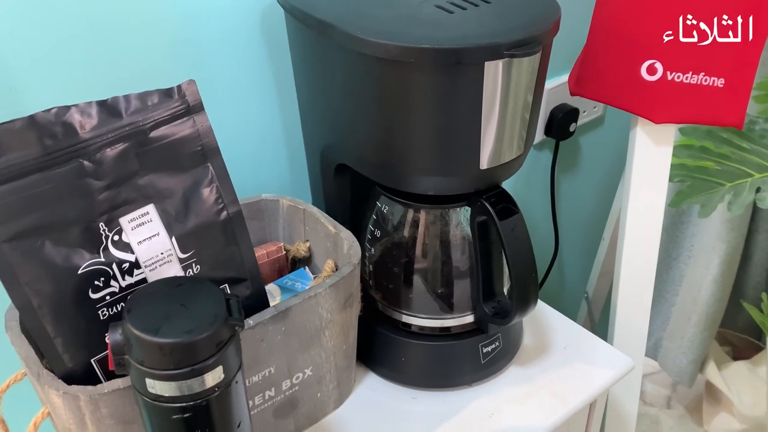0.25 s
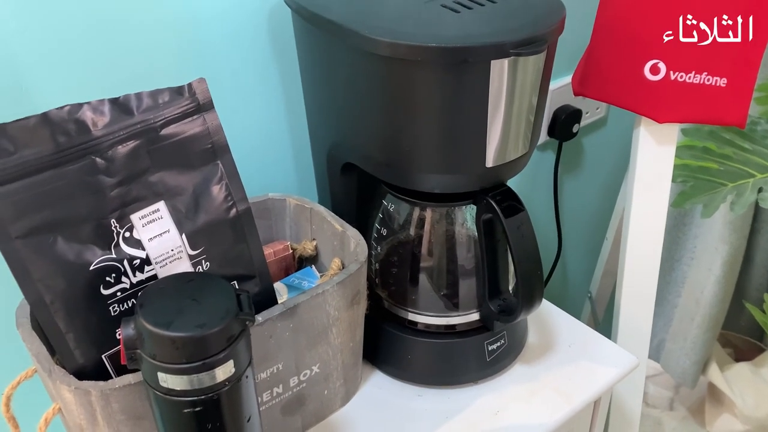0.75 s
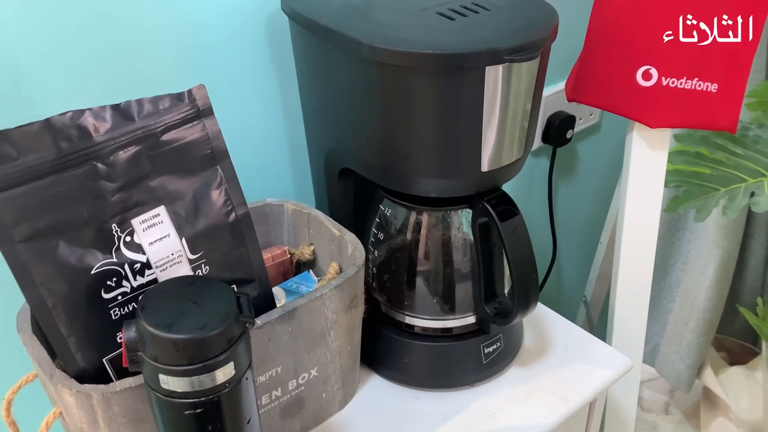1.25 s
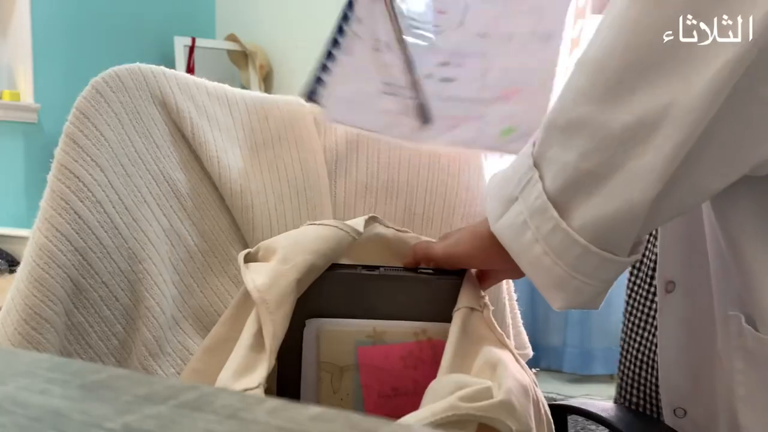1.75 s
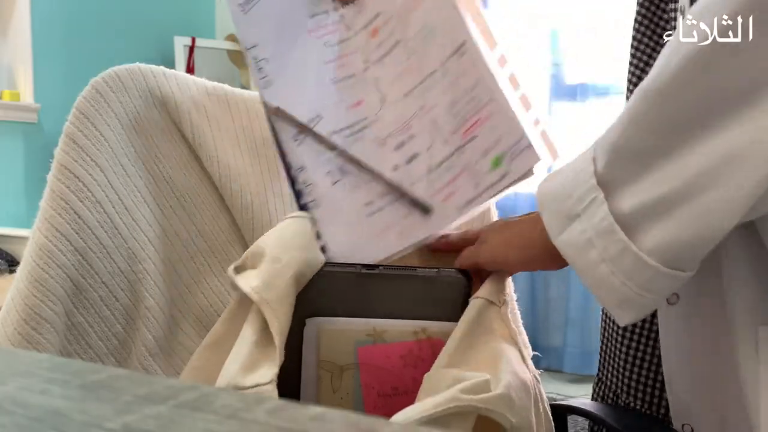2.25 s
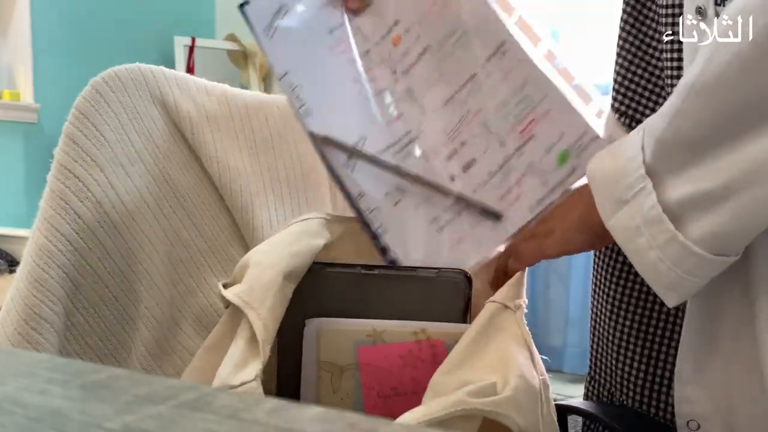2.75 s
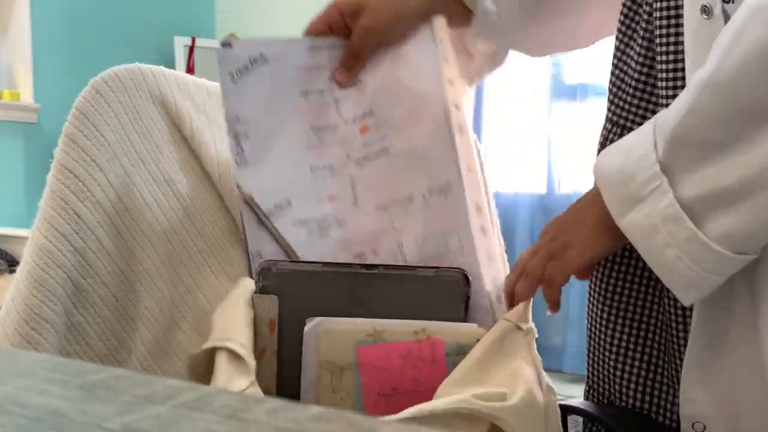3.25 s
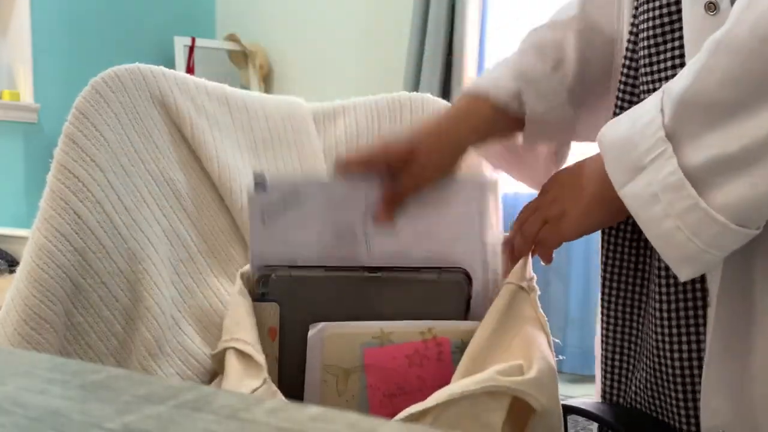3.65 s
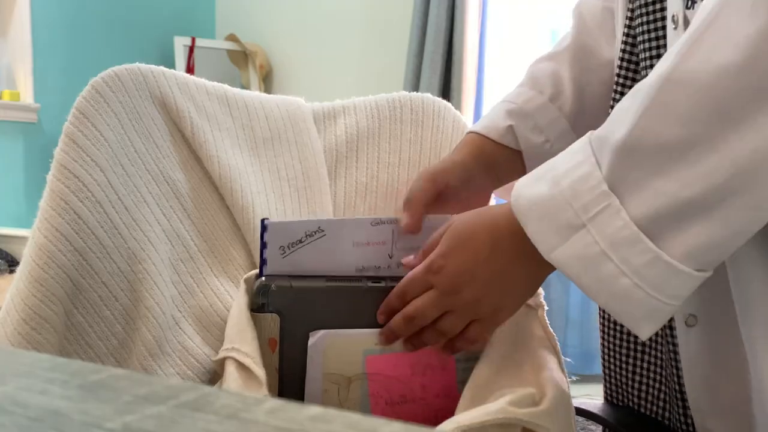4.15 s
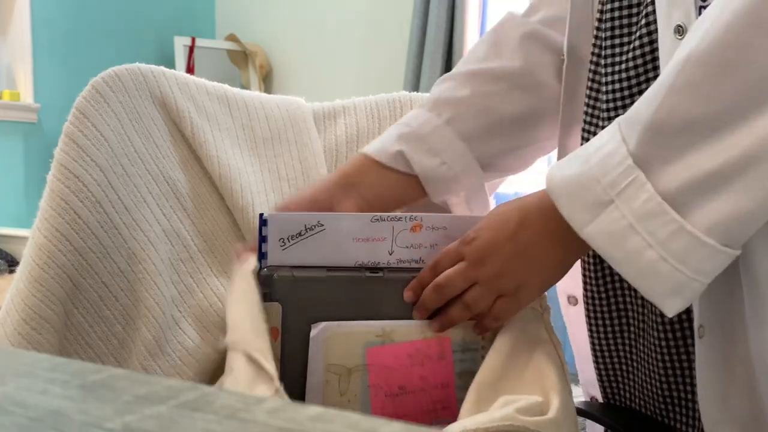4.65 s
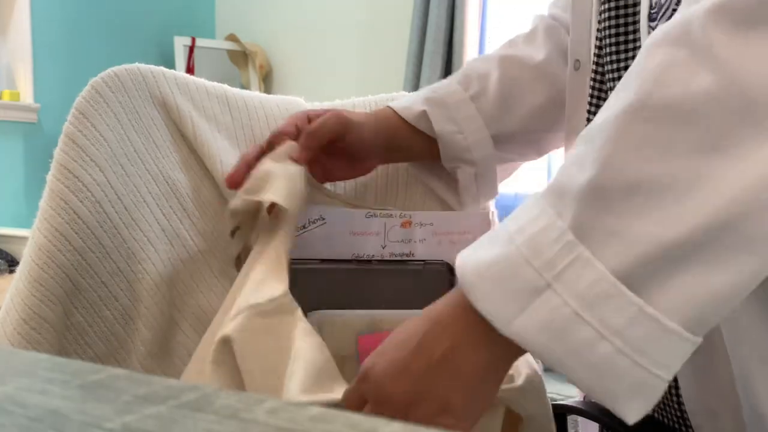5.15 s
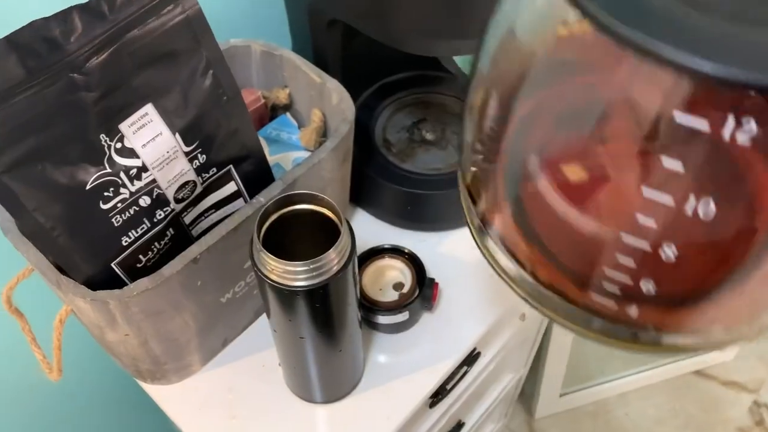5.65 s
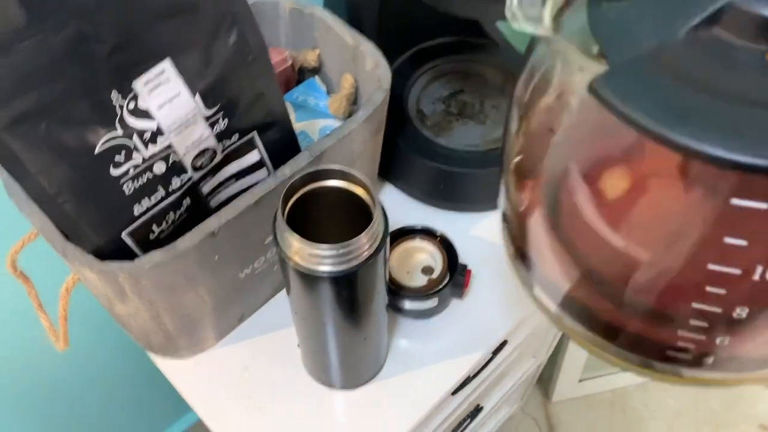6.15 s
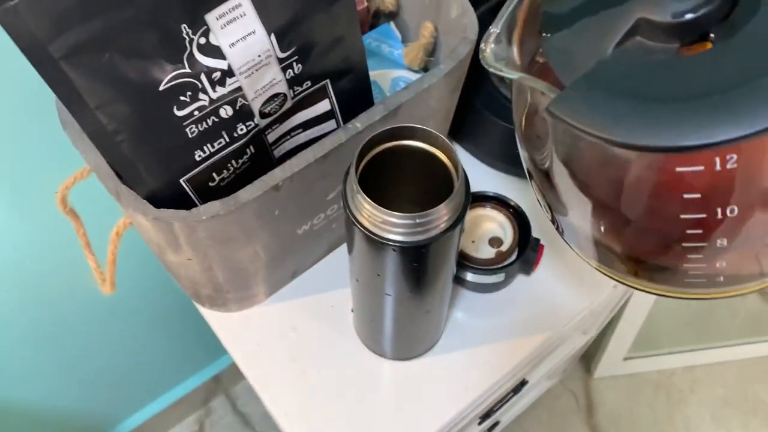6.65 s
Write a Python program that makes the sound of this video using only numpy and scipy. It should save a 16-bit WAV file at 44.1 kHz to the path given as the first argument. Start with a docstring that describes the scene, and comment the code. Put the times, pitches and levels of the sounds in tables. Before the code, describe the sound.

A drip coffee machine gurgles and spits steam, then papers rasp and knock into a canvas bag, then a glass jug lid ticks faintly.

```python
"""A drip coffee machine gurgles and spits steam in a small room: collapsing bubbles ring its plastic housing.
Cut to a sleeve of papers slid and knocked into a canvas bag: shaped noise rubs, rasps and snaps, dying sines thud.
Cut to a glass jug held in near quiet: soft handling noise, a lid that ticks on the glass and drops shut once.
A low motor tone and low noise lie under all three; a phone's two microphone ports hear them."""
import sys
import numpy as np
from scipy import signal
from scipy.fft import rfft, irfft
from scipy.io import wavfile
from scipy.ndimage import uniform_filter1d

SR = 44100
rng = np.random.default_rng(int(sys.argv[2]) if len(sys.argv) > 2 else 0)


def master_out(mix):
    """Clip the mix to full scale and print it as 16-bit PCM to the path in sys.argv[1]."""
    frames = np.transpose(np.atleast_2d(mix))
    ceiling = np.clip(frames, -1, 1)
    pcm = np.round(ceiling * 32767).astype(np.int16)
    wavfile.write(sys.argv[1], SR, pcm)


def level_to_linear(level):
    """Convert decibel levels to linear amplitude factors, elementwise."""
    exponent = np.asarray(level, float) / 20
    return 10 ** exponent


N = 304290
T = np.arange(N) / SR

# how hard the water boils: t/s, level/dB
BOIL = [(0.0, -40.5), (0.11, -42), (0.43, -45), (0.5, -38.5), (0.545, -28), (0.64, -35), (0.84, -53),
        (1.07, -50.5), (1.14, -30.5), (1.312, -37)]
# the clearest bubble collapses: t/s, boom peak level/dB, knock peak level/dB, pop peak level/dB
GULPS = [(0.035, -32.5, -38, -55), (0.105, -34, -34, -45), (0.122, -22, -40, -29.5), (0.147, -27, -35, -65),
         (0.206, -27, -29.5, -58), (0.235, -28, -34.5, -34), (0.275, -30.5, -32.5, -55),
         (0.301, -27.5, -53, -62), (0.338, -50, -33, -38), (0.368, -28, -32, -45), (0.399, -28, -36, -43),
         (0.424, -33, -30.5, -37.5), (0.46, -26, -33, -31.5), (0.514, -20.5, -29, -37),
         (0.538, -13.5, -23, -43), (0.571, -36, -50, -24), (0.62, -29, -49, -55), (0.688, -28, -49, -57),
         (0.773, -29.5, -28.5, -48), (0.876, -31, -40.5, -61), (1.022, -27, -27, -28.5),
         (1.089, -38, -40, -37), (1.165, -26.5, -32, -33.5), (1.218, -44, -34, -48), (1.261, -20, -25, -29),
         (1.298, -34.5, -37, -31.5)]
# resonances of the hollow plastic tank and tube: f/Hz, width/Hz, relative level/dB
HOUSING = [(167.4, 13, -10.5), (208, 53, -4.5), (255, 35.6, 2.5), (287, 39, -7.5), (371.6, 95, -15.5),
           (587, 48, -6.5), (903, 52, -4), (1463, 240, -13), (1907, 90, -16), (2212, 65, -12),
           (2490, 76, -21), (3030, 200, -31), (3515, 32, -18), (4085, 55, -36), (6140, 80, -39)]
# wet spits that ring the upper housing: t/s, peak level/dB
SPITS = [(0.11, -52), (0.522, -44), (0.53, -25.5), (.562, -45), (.575, -42), (0.611, -43), (1.031, -42),
         (1.135, -50), (1.219, -36)]


def bubbles():
    """Collapsing steam bubbles thump the housing: clear ones over a dense patter, wider resonances dying sooner."""
    modes = np.array([(hz, db + 20 * np.log10(width), 2.6 / width) for hz, width, db in HOUSING])
    at = rng.uniform(0, CUTS[0], size=560)
    sizes_db = 2.2 * np.minimum(rng.exponential(1, len(at)), 3.0)
    small = strike(at, sizes_db, modes, spread_db=5.0, rise=0.00049, detune=0.03)
    patter = curve(BOIL, axis=1) * small / np.std(small[T < CUTS[0]])
    s, boom_db, knock_db, pop_db = np.transpose(GULPS)
    # the last factor of each triple shortens the ring; booms are rising blips, each at a slightly random pitch
    booms = strike(s, boom_db, modes[:5] * [1, 1, .85], spread_db=4, rise=0.0022, detune=0.06, glide_per_s=.6)
    knocks = strike(s, knock_db, modes[5:7] * [1, 1, .8], spread_db=3, rise=0.001, detune=0.018, glide_per_s=.2)
    pops = strike(s, pop_db, modes[7:11] * [1, 1, .35], spread_db=4, rise=.0004, detune=.05)
    # the zero evens out the starting levels of the spits' resonances
    spits = strike(*np.transpose(SPITS), modes[9:14] * [1, 0, .4], spread_db=3, rise=.001, detune=.02)
    return patter + booms + knocks + pops + spits


# drops falling in the glass jug: t/s, peak level/dB
DRIPS = [(.036, -63), (.319, -60), (.728, -69), (.921, -56)]
# their ping: f/Hz, relative level/dB, t60/s
PING = [(4240, 2.5, 0.068), (2760, 1, .04)]


def drips():
    """Drops ping the glass jug: two sines, the higher and louder one ringing longer."""
    return strike(*np.transpose(DRIPS), PING, spread_db=1.5, rise=.001, detune=.003)


# spurts of steam: start t/s, length/s, level/dB
SPURTS = [(0.1, 0.0082, -55), (0.511, 0.016, -38), (0.55, 0.07, -55), (1.02, 0.012, -65),
          (1.085, 0.1, -49.5), (1.17, 0.11, -55)]
# colour of the steam: f/Hz, relative level/dB per Hz
STEAM = [(1120, -10), (1900, -1.5), (2460, 0.5), (2930, -4.5), (3500, -5.5), (3800, -7.5), (4080, -8.5),
         (4600, -8), (6050, -10.5), (8200, -23.5), (10500, -30), (11900, -52.5), (13200, -36), (15000, -57)]
SEETHE_DB = -23.5  # the steady steam lies this far under the boil


def steam():
    """Escaping steam is turbulent hiss that follows the boil and spurts, spluttering with droplets."""
    jets = strokes(SPURTS, axis=2, swell=0.36, t60=0.14) + level_to_linear(SEETHE_DB) * curve(BOIL, axis=1)
    return jets * noise(STEAM, 4, 0.5, size=512) * crackle(500, depth=0.35, spike_s=0.002)


def brewer():
    """Bubbles and drips ring in the room; the steam is heard without its echo."""
    return room(bubbles() + drips(), wet_db=-14) + steam()


# canvas rubbing under the weight: t/s, level/dB
LOAD = [(1.32, -47.5), (1.73, -43), (2.01, -49), (2.3, -46.5), (2.9, -45), (3.0, -43.5), (3.06, -35.5),
        (3.25, -43.5), (3.5, -45.5), (3.77, -38.5), (4.1, -46.5), (4.2, -44.5), (4.33, -54.5),
        (4.56, -53.5), (4.68, -47), (4.74, -39.5), (4.85, -48), (5.0, -45.5), (5.27, -51.5)]
# colour of the canvas: f/Hz, relative level/dB per Hz
CANVAS = [(35, -29), (60, -23), (153, 4), (219, -8.5), (307, -6), (385, -3), (462, -21.5), (586, -3.5),
          (783, -24.5), (913, -6), (1330, -20.5), (1480, -17), (1800, -28), (2290, -23), (3500, -35.5),
          (4550, -61), (7700, -120)]


def canvas_rub():
    """Cloth rubbing on itself is a dull, patchy noise that follows the load."""
    return curve(LOAD, axis=1) * noise(CANVAS, 1.8, 1.2, size=1024)


# strokes of the sleeve: start t/s, length/s, level of its edge's rasp/dB, level of its face's fizz/dB
STROKES = [(1.33, 0.013, -61, -79), (1.44, 0.084, -66, -68), (1.55, 0.26, -63.5, -73.5),
           (1.85, 0.0062, -69, -65), (2.25, 0.064, -54, -62.5), (2.59, 0.057, -43, -55),
           (2.625, 0.077, -38.5, -52), (2.82, 0.005, -49, -58), (2.855, 0.027, -37, -55.5),
           (2.935, 0.0056, -65, -78), (3.005, 0.053, -48.5, -60.5), (3.09, 0.074, -57, -69),
           (3.195, 0.071, -47.5, -54), (3.33, 0.046, -41, -49), (3.39, 0.043, -46.5, -59.5),
           (3.53, 0.054, -52, -58), (3.6, 0.022, -46, -55.5), (3.65, 0.089, -41, -49),
           (3.888, 0.018, -44, -50), (4.06, 0.17, -61, -62.5), (4.55, 0.3, -71, -73.5),
           (5.143, 0.0066, -72, -59.5), (5.198, 0.014, -78, -55)]
# colour of the rasp: f/Hz, relative level/dB per Hz
RASP = [(1200, -23), (2400, -14), (2800, -9.5), (3250, -7), (3420, -10), (3660, -4), (4100, -8.5),
        (4400, -8.5), (5000, -23), (7000, -44.5)]
# colour of the fizz: f/Hz, relative level/dB per Hz
FIZZ = [(2650, -35.5), (4500, -5), (5530, -5), (10500, -18.5), (11400, -33), (13700, -21.5), (15000, -48)]
CREEP_RASP_DB, CREEP_FIZZ_DB = -25.5, -30.5  # between strokes the sleeve creeps with the canvas, this far under it


def sleeve_slide():
    """The sleeve's edge rasps with many small spikes while its face fizzes with fewer, sharper ones."""
    edge = strokes(STROKES, axis=2, swell=0.85, t60=0.08) + level_to_linear(CREEP_RASP_DB) * curve(LOAD, axis=1)
    face = strokes(STROKES, axis=3, swell=0.48, t60=0.36) + level_to_linear(CREEP_FIZZ_DB) * curve(LOAD, axis=1)
    rasp = edge * noise(RASP, 2.5, 0.7, size=512) * crackle(250, depth=0.35, spike_s=0.002)
    fizz = face * noise(FIZZ, 1.2, 0.83, size=256) * crackle(30, depth=1.4, spike_s=0.0003)
    return rasp + fizz


# the clearest knocks of what goes in the bag:
# t/s, slap peak level/dB, thud peak level/dB, snap level/dB, brightness/dB per octave
KNOCKS = [(1.334, -45, -50, -60.5, 7), (1.48, -45, -31, -44, 2), (1.864, -62, -65, -39.5, -7),
          (2.275, -37.5, -46, -40, 8), (2.305, -37, -41, -40, 5), (2.339, -36, -37, -37.5, 5.5),
          (2.391, -40, -41, -57, 5), (2.868, -36, -44, -38, 4), (3.016, -31.5, -29, -55, 8),
          (3.027, -30, -21, -59, -5), (3.085, -41, -38, -61, 15.5), (3.127, -55, -27, -56, -5),
          (3.256, -35.5, -56.5, -42.5, 5.5), (3.35, -27.5, -30, -45, 6.5), (3.538, -63, -65.5, -42, 3),
          (3.569, -56, -56.5, -50, -14.5), (3.585, -30, -32, -49.5, 7.5), (3.694, -19.5, -46.5, -32, 9.5),
          (3.7, -40, -13.5, -26.5, 14), (3.699, -15, -49.5, -60.5, 0), (3.716, -49.5, -24, -63.5, -14),
          (3.72, -37, -22, -43.5, 9), (3.733, -28, -31, -54, -3), (3.798, -53, -36, -47, -11),
          (3.897, -59, -50, -27.5, 3), (4.123, -42.5, -41, -49, 8), (4.154, -35.5, -42, -56, 12),
          (4.197, -27, -32, -29, 11), (4.571, -46, -61, -70, 4), (4.75, -31, -40, -48, 5.5),
          (4.765, -37, -29, -54, -6.5), (4.862, -42, -40, -53, 8), (5.146, -53, -35.5, -50, -2),
          (5.201, -66, -41, -60, 11)]
# thud of the loaded bag: f/Hz, relative level/dB, t60/s
BAG = [(109, -11.5, 0.17), (156, -3, .14), (200, -20.5, 0.078), (250, -7, .05), (345, 1, 0.07),
       (395, -3, 0.05)]
# slap of the stiff folder: f/Hz, relative level/dB, t60/s
FOLDER = [(527, -8, 0.025), (614, 0.5, 0.058), (729, 2.5, 0.025), (870, -8, 0.025), (1157, 1, 0.018),
          (1349, -2.5, 0.025), (1600, -2.5, 0.009), (1840, -7.5, 0.0064)]


def bag_knocks():
    """Each knock thuds the loaded bag and slaps the stiff folder; small bumps jostle at random times."""
    s, slap_db, thud_db, _, tilt_db = np.transpose(KNOCKS)
    at = rng.uniform(*CUTS, size=24)
    sizes_db = -3.0 + 1.8 * np.minimum(rng.exponential(1, len(at)), 2.5)
    bumps = curve(LOAD, axis=1) * strike(at, sizes_db, FOLDER, spread_db=2.5, rise=0.00037)
    thuds = strike(s, thud_db, BAG, spread_db=3.5, rise=0.00073, tilt_db=tilt_db)
    slaps = strike(s, slap_db, FOLDER, spread_db=1.5, rise=0.0017, tilt_db=tilt_db)
    return bumps + thuds + slaps


# colour of the snaps: f/Hz, relative level/dB per Hz
SNAP = [(1060, -33), (1800, -0.5), (4410, 3), (6340, -8.5), (11000, -13.5), (13500, -16.5), (15000, -30)]


def snaps():
    """Hard edges snap as a crack with a short puff of bright noise; faint crinkles fall at random."""
    s, _, _, snap_db, _ = np.transpose(KNOCKS)
    blows, t = np.zeros(N), T[:4000]
    blows[(s * SR).astype(int)] = level_to_linear(snap_db)
    crinkles = rng.random(N) < 4 / SR  # about four a second
    blows += crinkles * level_to_linear(-16.0 + 2.8 * rng.standard_normal(N)) * curve(LOAD, axis=1)
    crack = level_to_linear(-60 * t / 0.0084)
    puff = level_to_linear(-8.5 - 60 * t / 0.053)
    envelope = (crack + puff) * (1 - np.exp(-t / 0.00054))
    return signal.oaconvolve(blows, envelope)[:N] * noise(SNAP, 0.38, 3.0, size=128)


def packing():
    """Canvas, sleeve and snaps are heard close; the knocks ring in the room."""
    return canvas_rub() + sleeve_slide() + snaps() + room(bag_knocks(), wet_db=-12)


# holding the jug: t/s, handling rumble level/dB, soft hiss level/dB
HOLD = [(5.27, -80, -63.5), (5.52, -70.5, -64.5), (5.58, -69, -72.5), (5.64, -73, -82.5), (6.0, -82.5, -88),
        (6.28, -74.5, -85), (6.42, -75, -90), (6.48, -69.5, -92), (6.5, -45, -71.5), (6.54, -71, -79),
        (6.6, -71, -80.5), (6.7, -68, -86), (6.75, -84.5, -99.5)]
# colour of the rumble: f/Hz, relative level/dB per Hz
RUMBLE = [(120, -52), (200, -1), (384, -7.5), (424, -3.5), (700, -4), (970, -22), (1620, -27), (3620, -32),
          (4000, -42), (5200, -69), (8800, -120)]
# colour of the hiss: f/Hz, relative level/dB per Hz
HISS = [(590, -52), (1000, -25.5), (1490, -2.5), (2340, -0.5), (9640, 1.5), (12000, -5), (13700, -10),
        (15000, -45.5)]


def hand():
    """A hand shifting on the jug makes a dull rumble and a soft hiss, each its own noise."""
    rumble = curve(HOLD, axis=1) * noise(RUMBLE, 2.5, 1.8, size=512)
    return rumble + curve(HOLD, axis=2) * noise(HISS, 1.6, 0.78, size=256)


# the lid drags along the rim: t/s, level/dB
DRAG = [(6.43, -100), (6.46, -71), (6.5, -74), (6.55, -67), (6.59, -62), (6.63, -70.5), (6.69, -64.5),
        (6.73, -81)]
# colour of the drag: f/Hz, relative level/dB per Hz
RIM = [(450, -20), (600, 2.5), (800, 4.5), (1000, -22), (1680, -7), (2300, -17), (4300, -28), (7300, -40),
       (8100, -18), (9100, -24), (10000, -30), (15000, -58)]


def lid_drag():
    """The lid scrapes along the rim: noise roughened by short spikes."""
    return curve(DRAG, axis=1) * noise(RIM, 1.4, 2.1, size=512) * crackle(120, depth=0.81, spike_s=0.0011)


# the lid drops shut: f/Hz, relative level/dB, t60/s
LID = [(402, -26, 0.043), (495, 12.5, 0.057), (562, -19, 0.047), (717, 5, 0.062), (823, -3, 0.076),
       (1900, -26, .01)]
LID_S, LID_DB = 6.497, -34  # time, peak level
# the full jug jolts in the hand just after: f/Hz, relative level/dB, t60/s
SWAY = [(55, -2, .14), (90, 0, .1), (130, -8, .07)]
SWAY_S, SWAY_DB = 6.508, -39  # time, peak level


def lid_drop():
    """The lid rings briefly as it lands, then the jug's weight gives a deep jolt."""
    landing = strike([LID_S], [LID_DB], LID, spread_db=0, rise=.0015, detune=0)
    return landing + strike([SWAY_S], [SWAY_DB], SWAY, spread_db=0, rise=.004, detune=0)


# lid on glass: t/s, peak level/dB, best woken f/Hz, share of the ring left undamped
TICKS = [(5.6884, -64, 4120, 0.6), (5.734, -65, 7000, 0.5), (5.782, -57, 3000, 0.98),
         (6.0393, -53.5, 3940, 0.97), (6.216, -60, 3700, 0.47)]
# the glass's modes: f/Hz, relative level/dB, undamped t60/s
GLASS = [(2155, 1.5, .055), (2750, -1, .045), (2870, -3, .04), (3700, -3, .045), (3810, -4, .04),
         (4290, -5, .04), (6300, -8, .025), (6800, -3, .03), (8600, -2, .015), (10400, 5, .015)]


def lid_ticks():
    """Each tick favours the glass modes near one pitch, and the touching lid shortens their ring."""
    ticks = np.zeros(N)
    for s, db, best_hz, share in TICKS:
        woken = [(hz, mode_db - 7 * abs(np.log2(hz / best_hz)), t60 * share) for hz, mode_db, t60 in GLASS]
        ticks += strike([s], [db], woken, spread_db=1, rise=0.00018, detune=0)
    return ticks


def jug():
    """Hand and dragging lid are heard close; the hits ring in the room."""
    return hand() + lid_drag() + room(lid_drop() + lid_ticks(), wet_db=-15)


# low tone and low noise under the scenes; the noise surges with the thuds:
# t/s, motor tone level/dB, low noise level/dB
UNDERTONE = [(0.0, -69, -46.5), (0.27, -49, -72), (0.44, -64, -79), (0.54, -50, -36), (0.96, -49.5, -57.5),
             (1.17, -60, -72), (1.88, -63.5, -67), (2.32, -46, -45), (2.58, -48.5, -77), (3.09, -49, -43.5),
             (3.63, -58, -65.5), (3.71, -51, -39.5), (4.44, -60.5, -69), (4.75, -64, -50.5),
             (5.65, -60, -67), (6.11, -79, -63.5), (6.28, -60, -60.5), (6.9, -69, -84)]
# colour of the low noise: f/Hz, relative level/dB per Hz
LOW_NOISE = [(35, -21.5), (60, 5.5), (76, -20), (113, 2.5), (146, -9.5), (160, -18), (210, -42.5),
             (350, -120)]
# colour of the microphone's own noise: f/Hz, relative level/dB per Hz
QUIET = [(53, -28.5), (90, -2.5), (135, -4.5), (268, -10.5), (545, -22), (1260, -32), (7130, -41),
         (10300, -38.5), (11900, -42.5), (13300, -37), (15100, -59.5)]
QUIET_DB, MOTOR_HZ = -66, 52.4


def undertone():
    """A distant motor's wavering tone, a low noise that surges, and the microphone's own faint noise."""
    drift = evened(uniform_filter1d(uniform_filter1d(rng.standard_normal(N), size=6000), size=6000))
    tone = np.sqrt(2) * np.sin(2 * np.pi * np.cumsum(MOTOR_HZ + 1.5 * drift) / SR)
    low = curve(UNDERTONE, axis=2) * noise(LOW_NOISE, 5.3, 0.87, size=2048)
    return curve(UNDERTONE, axis=1) * tone + low + level_to_linear(QUIET_DB) * noise(QUIET, 0.52, 0.85, size=1024)


def strike(times, db, modes, spread_db, rise, detune=0.03, tilt_db=0, glide_per_s=0):
    """Each blow lands elsewhere, so it wakes the dying sines in its own mix; db is its peak."""
    t, out = T[:SR // 5], np.zeros(N + SR)
    hz, mode_db, t60 = np.transpose(modes)[:, :, None]
    chance = rng.standard_normal((len(times), 2, len(modes), 1))
    tilts = tilt_db + 0 * np.array(times)  # dB per octave, one a blow
    for s, peak_db, tilt, (luck, bend) in zip(times, db, tilts, chance):
        start_db = mode_db + tilt * np.log2(hz) + spread_db * luck
        pitch = hz * (1 + detune * bend + glide_per_s * t)
        sines = level_to_linear(start_db - 60 * t / t60) * np.sin(2 * np.pi * pitch * t)
        sound = sines.sum(0) * (1 - np.exp(-t / rise))
        out[int(s * SR):][:len(t)] += level_to_linear(peak_db) * sound / abs(sound).max()
    return out[:N]


SETTLE_DB, SETTLE_T60_S = -7.5, 0.36  # after a stroke or spurt a weaker rustle lingers


def strokes(rows, axis, swell, t60):
    """Each stroke swells to its end, lets go quickly and settles slowly; powers add."""
    power = np.zeros(N)
    for row in rows:
        start, length = row[:2]
        since = T - start - length
        rise = np.clip(1 + since / length, 0, 1) ** swell
        after = np.maximum(since, 0)
        fall = np.maximum(level_to_linear(-60 * after / t60), level_to_linear(SETTLE_DB - 60 * after / SETTLE_T60_S))
        power += (level_to_linear(row[axis]) * rise * fall) ** 2
    return np.sqrt(power)


def crackle(per_s, depth, spike_s):
    """A gain of rms 1 with sparse short spikes."""
    spikes = (rng.random(N) < per_s / SR) * rng.exponential(1, N)
    decaying = signal.lfilter([1], [1, -np.exp(-1 / (spike_s * SR))], spikes)
    return evened(1 + depth * decaying)


def noise(spectrum, patchy_db, flicker_db, size):
    """Random short-time spectra with drifting patches and a flicker shared by all pitches; rms 1."""
    frames, hz = 4 * N // size + 5, np.fft.rfftfreq(size, 1 / SR)
    a, b, c, d, patches = rng.standard_normal((5, frames, len(hz)))
    patches = evened(uniform_filter1d(uniform_filter1d(patches, size=6, axis=0), size=5, axis=1))
    flicker = evened(uniform_filter1d(rng.standard_normal((frames, 1)), size=3, axis=0))
    level_db = read(spectrum, hz) + patchy_db * patches + flicker_db * flicker
    z = paired(a + 1j * b, c + 1j * d, hz) * level_to_linear(level_db)
    return evened(signal.istft(z.transpose(0, 2, 1), nperseg=size, noverlap=size * 3 // 4)[1][:, :N])


def curve(rows, axis):
    """Gain over time from one dB column."""
    columns = np.transpose(rows)
    return level_to_linear(np.interp(T, columns[0], columns[axis]))


def evened(x):
    """Scales to rms 1."""
    return x / np.sqrt(np.mean(x ** 2) + 1e-20)


def read(points, hz):
    """Value of a spectrum on a log-frequency axis."""
    f, value = np.transpose(points)
    return np.interp(np.log(hz + 1), np.log(f + 1), value)


# decay of the room: f/Hz, t60/s
ROOM = [(100, 0.12), (400, 0.32), (1500, 0.11), (6000, 0.02), (15000, 0.016)]


def room(x, wet_db):
    """Direct sound with a close reflection in the right port, then a diffuse tail whose treble dies first."""
    t = T[:SR // 2]
    hz, at, z = signal.stft(rng.standard_normal((2, len(t))), SR, nperseg=256)
    t60 = read(ROOM, hz)[:, None]
    tails = signal.istft(z * level_to_linear(-60 * at / t60) / np.sqrt(t60), nperseg=256)[1][:, :len(t)] * (t > .006)
    tails = level_to_linear(wet_db) * rfft(tails / np.linalg.norm(tails[0]))
    hz = np.fft.rfftfreq(len(t), 1 / SR)
    reflection = np.exp(-2j * np.pi * hz * 0.001263)  # 1.263 ms late
    ears = irfft(paired(1 + tails[0], reflection + tails[1], hz))
    # rolled so that a port that leads keeps its lead, then shifted back
    return signal.oaconvolve(x[None], np.roll(ears, 256, axis=1), axes=1)[:, 256:N + 256]


# how alike the two ports hear: f/Hz, likeness
LIKENESS = [(60, 1), (350, 1), (600, 0.91), (2000, 0.91), (6000, 0.29), (14000, 0.92)]
# how far the left port leads: f/Hz, phase/rad
LEAD = [(0, 0.71), (300, 0.2), (600, 1.69), (1380, 0.86), (2150, 2), (4390, 0), (6200, 5.5), (7920, 12),
        (8960, 10), (9730, 7), (10900, -16), (11100, -7.5), (12300, -9), (13000, 0), (14000, -7.5),
        (14800, 1)]


def paired(left, other, hz):
    """Both ports hear the same bass; the phone's body turns and loosens the treble."""
    same = np.clip(read(LIKENESS, hz), -1, 1)
    turn = np.exp(-1j * np.interp(hz, *np.transpose(LEAD)))
    right = same * turn * left + np.sqrt(1 - same ** 2) * other
    return np.array([left, right])


# where one scene gives way to the next: t/s
CUTS = [1.312, 5.264]


def scene():
    """Each scene, with its undertone, stops dead at its cut and the next fades in over 14 ms."""
    starts, ends = [-1] + CUTS, CUTS + [T[-1] + 1]
    gates = [np.clip((T - a) / .014, 0, 1) * (T < b) for a, b in zip(starts, ends)]
    under = undertone()
    return sum(gate * (part + under) for gate, part in zip(gates, [brewer(), packing(), jug()]))


def low_pass(x):
    """Removes everything above the highest recorded frequency."""
    return signal.sosfilt(signal.butter(12, 15240, fs=SR, output="sos"), x)


LOW_CUT_HZ = 50


def record(dry):
    """A steep high-pass filter takes out the deepest bass."""
    mix = signal.sosfilt(signal.butter(6, LOW_CUT_HZ, "high", fs=SR, output="sos"), dry)
    return low_pass(mix)


dry = scene()
out = record(dry)
master_out(out)
```